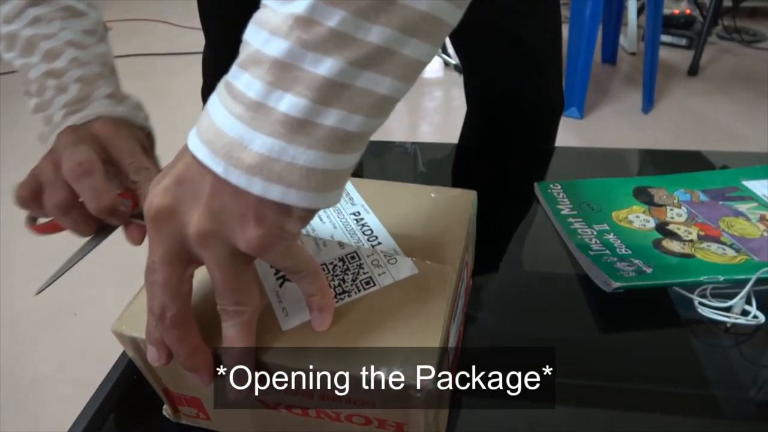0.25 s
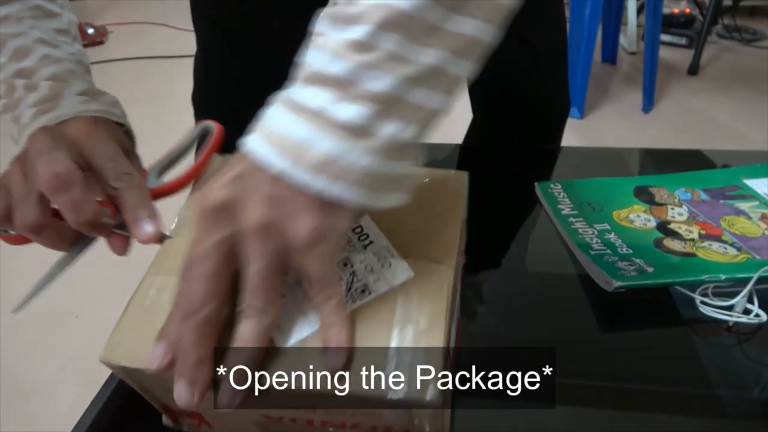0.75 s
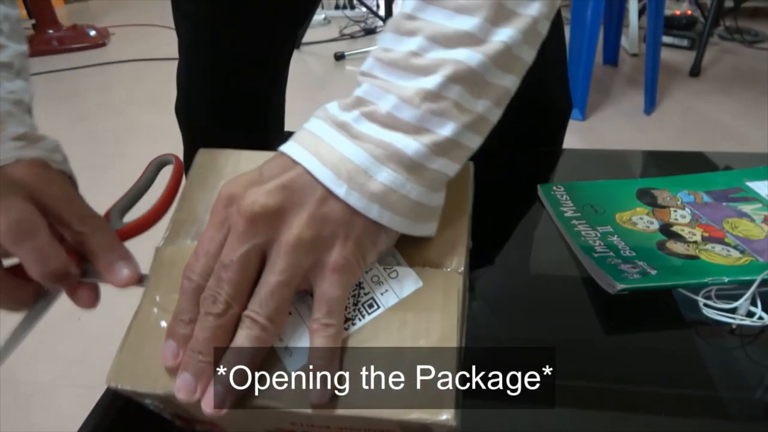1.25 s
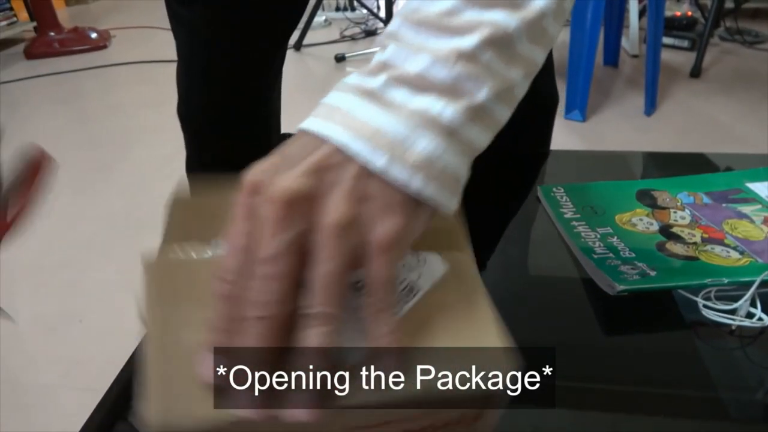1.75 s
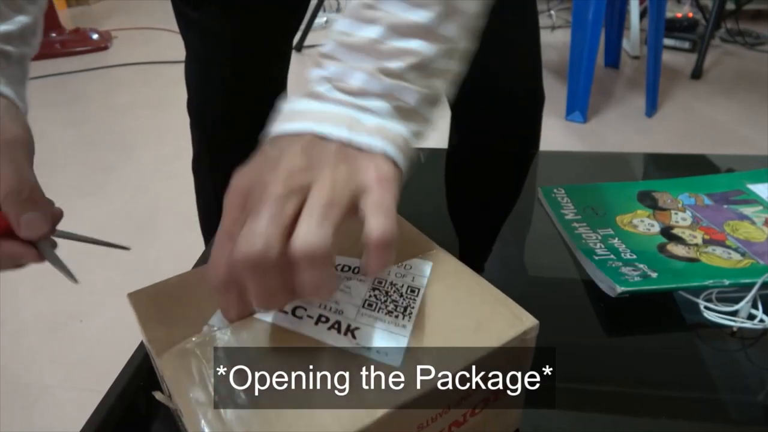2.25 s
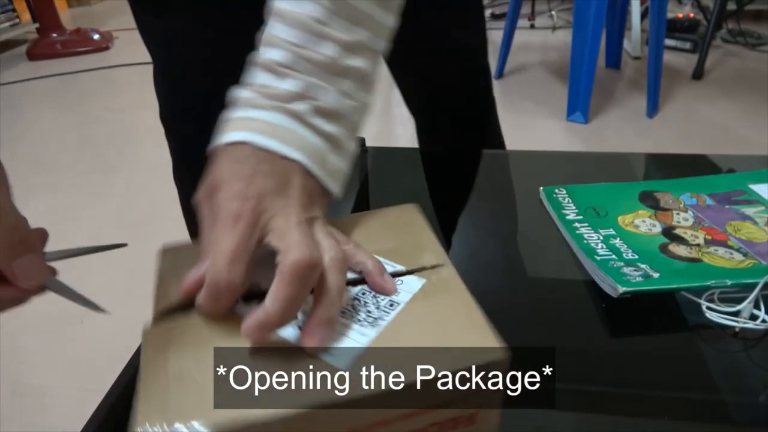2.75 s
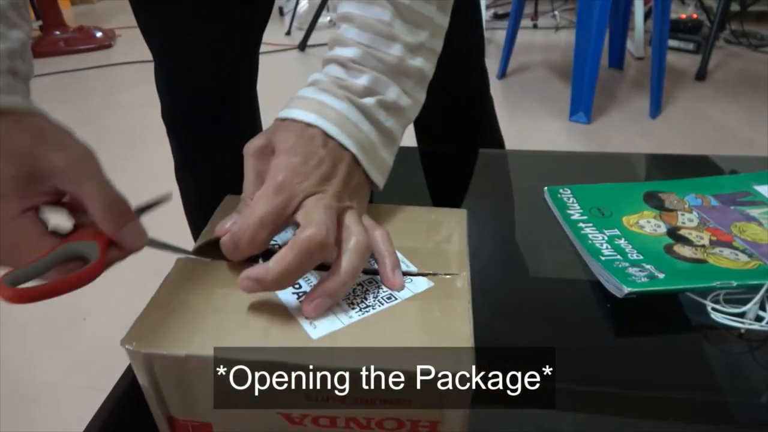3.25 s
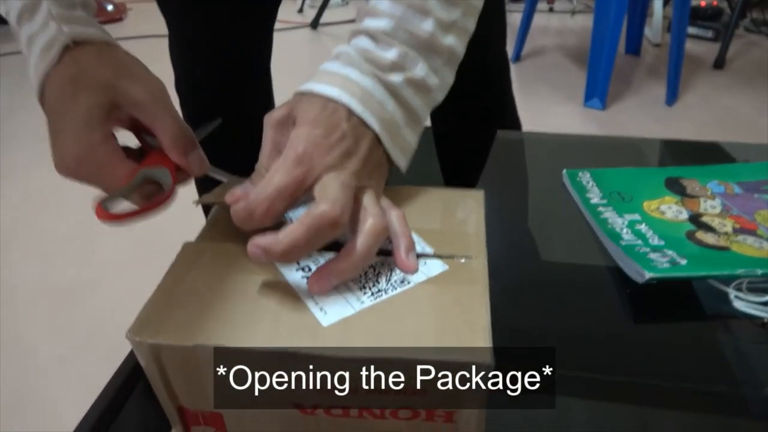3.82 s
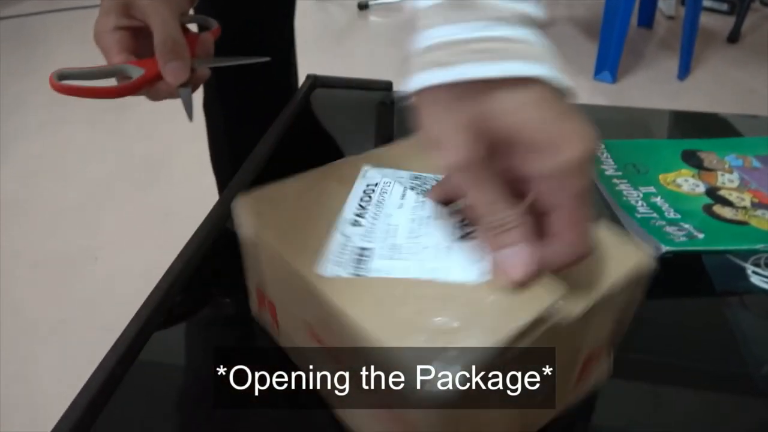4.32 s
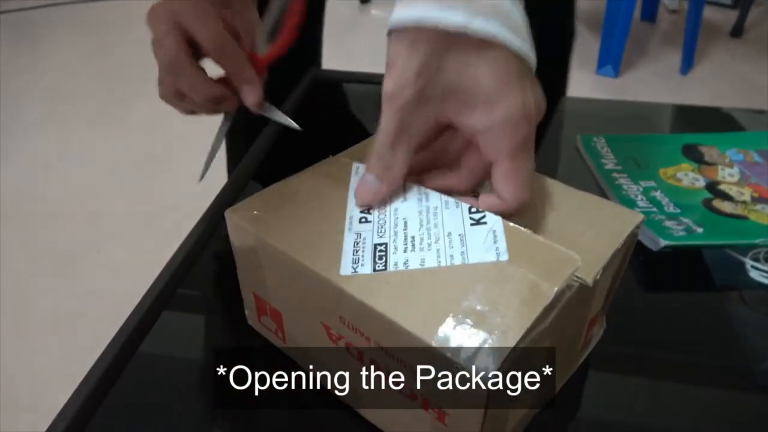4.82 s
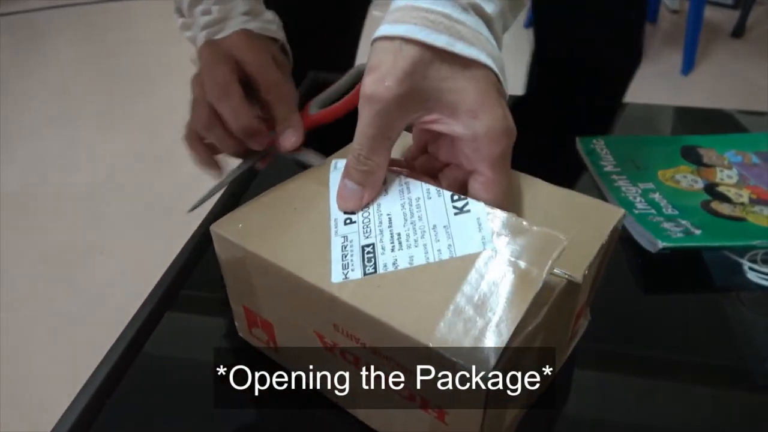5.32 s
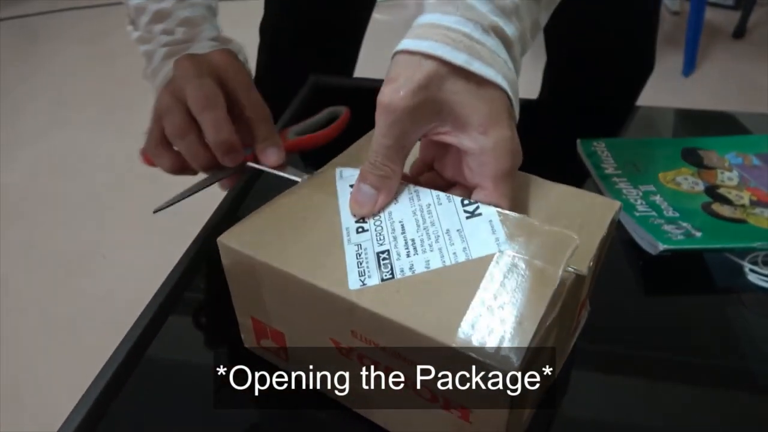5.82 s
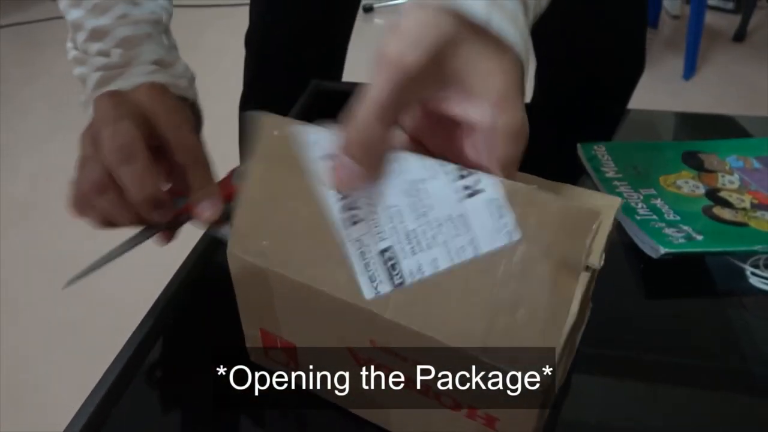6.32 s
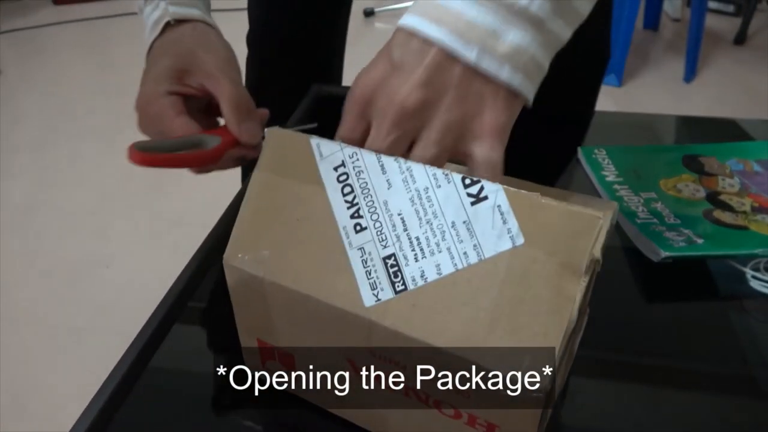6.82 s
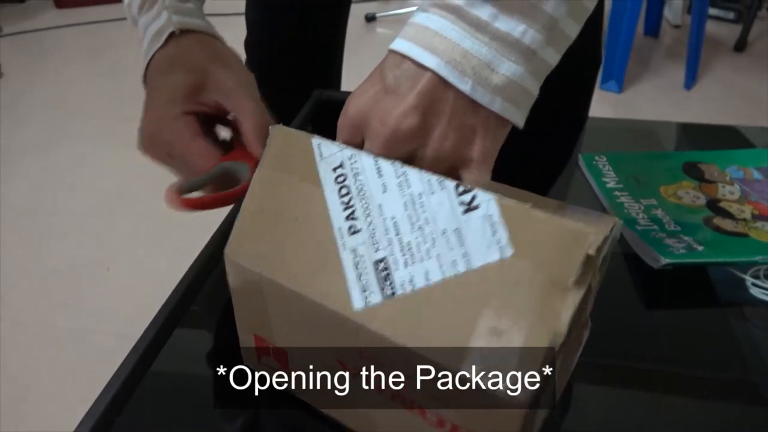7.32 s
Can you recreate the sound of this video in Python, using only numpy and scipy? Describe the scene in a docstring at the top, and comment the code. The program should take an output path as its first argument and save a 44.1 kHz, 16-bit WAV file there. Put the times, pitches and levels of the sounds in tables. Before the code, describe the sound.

A quiet room with soft low air noise and a very faint hum, heard through a small close microphone with short natural reverberation. At 0.1 s a cardboard box shifts gently; from 0.7 s it scuffs softly. Around 0.9 to 1.35 s scissors push through tape with faint ticks, ending in a sharp snap and bright rasp at 1.3 s. The box is turned: a hollow thump and slide at 1.8 s, small knocks near 2.3 s, a firm thud at 2.6 s. After near quiet, tape ticks at 3.5 s and snaps loudly at 3.6 s. Light knocks and brushing hands follow from 4 to 4.8 s, then a lull. From 5.6 s a longer cut grows into coarse ripping near 6 s, with a pop, knocks and short creaks to 6.9 s. Handling knocks at 7 to 7.2 s precede a last abrupt snapping push at 7.37 s and a soft slide.

```python
"""Scissors slit the packing tape of a cardboard box on a glass table, close by in a quiet room with a faint hum.
The box first knocks and slides softly; a short cut at about 1 s ends in a sharp snap and rasping pushes.
Then the box is turned: it slides and knocks, hands brush over it, and taut tape snaps loudly at 3.6 s.
A longer cut follows from 5.6 s with creaks and knocks, and after more handling a last push at 7.35 s.
Rasps and slides are streams of tiny slips through filters; snaps and knocks are bursts with dying tones."""
import sys
import numpy as np
from scipy import signal
from scipy.io import wavfile
from scipy.ndimage import uniform_filter1d

SR = 44100
rng = np.random.default_rng(int(sys.argv[2]) if len(sys.argv) > 2 else 0)


def persist_wave(psi):
    """Save psi, clipped to +-1, as 16-bit WAV."""
    counts = np.round(np.clip(psi, -1, 1) * 32767).astype(np.int16)
    wavfile.write(sys.argv[1], SR, np.atleast_2d(counts).T)


N = 333704  # length of the scene [samples]
EDGE_HZ = 16050  # upper limit of the sound
TAPS = 2048  # length of the colouring filters [samples]
HZ = np.maximum(np.fft.rfftfreq(TAPS, 1 / SR), 1)  # frequencies at which filters are drawn [Hz]

# low tones of the struck box: (frequency [Hz], level [dB], time to fall 60 dB [s])
BOX_MODES = [(110, -12.5, 0.072), (168, -6, 0.048), (292, -5, 0.043), (446, -11, 0.063)]


def stroke(s, rise_s, hold_s, rasp_db, drone_db, fizz_db, tape_hz):
    """The blade tears through tape; the same slips ring tape and lid, shake the box and fizz at the edge."""
    # resonances of the taut tape: (multiple of its pitch [ratio], width [Hz], level [dB])
    tape_modes = [(1, 200, -7.5), (1.3, 220, -9), (1.85, 243, -12), (3.2, 420, -10.5)]
    # spectra of the three parts: (frequency [Hz], relative level [dB])
    rasp_spectrum = [(300, -48), (750, -12), (1200, 5.5), (2500, 3.5), (4800, -0.5), (6500, -13.5),
                     (10000, -44.5)]
    drone_spectrum = [(25, -33.5), (50, -18), (110, -3), (260, 6), (480, -1), (700, -1), (1200, -15.5),
                      (3000, -54)]
    fizz_spectrum = [(2500, -39), (6000, -2.5), (9000, 2.5), (16000, -5.5)]
    # the tape yields during a push, then the blade comes free
    start, force = gesture(s, rise_s, hold_s, sag_db=3, release_s=0.03)
    size = len(force)
    tear = slips(size, per_s=1500, spread_db=0.2, clump_db=0.45, clump_s=0.0045)
    taut = np.zeros(size)
    for multiple, width, db in tape_modes:
        # the free length of tape changes as the blade advances, so each resonance wanders
        wandering_hz = tape_hz * multiple * np.exp(0.08 * wobble(size, over_s=0.025))
        taut += amp(db) * unit(resonate(tear, wandering_hz, width))
    tape_peak_db = hump(tape_hz, below_db=2.0, above_db=-0.5)
    rasp = unit(colour(tear + taut, read(rasp_spectrum) + 0.76 * lid() + tape_peak_db))
    drone = unit(colour(tear, read(drone_spectrum) + lid()))
    fizz = unit(colour(tear, read(fizz_spectrum)))
    return start, force * (amp(rasp_db) * rasp + amp(drone_db) * drone + amp(fizz_db) * fizz)


def tick(s, db, bright_hz, length_s, tail_db):
    """A short run of tape gives way: a burst of uneven fractures, a high ringing tail and a jolt of the box."""
    # tones of the high ringing tail: (frequency [Hz], level [dB], time to fall 60 dB [s])
    tail_tones = [(2487, -2, 0.46), (2850, -5, .35), (3290, -3.5, .4), (4260, -2, 0.52), (4380, -3.5, .45),
                  (5950, -1.5, 0.28), (7483, -0.5, .36), (9889, -15, 0.27), (12720, -10.5, 0.25)]
    blur_hz = 260  # each tone of the ringing tail is widened into a narrow noisy band
    thump_db = -20  # jolt of the box, relative to the snap
    t = np.arange(SR // 2) / SR
    # about three samples in ten hold a fracture
    fractures = unit(rng.standard_normal(len(t)) * (rng.random(len(t)) < .3))
    crack = fractures * np.exp(-(t / max(length_s, 2e-4)) ** 3)
    crack[0] += 2.2  # the first fracture is a large one
    # away from the peak the spectrum levels off: the fractures are bright, the more so in a bright snap
    fine_db = hump(12500, below_db=0.5, above_db=1.0) - 15.0 + 3.5 * np.log2(bright_hz / 3000)
    peak_db = hump(bright_hz * 0.74, below_db=18, above_db=11.5)
    snap = sized(colour(crack, np.maximum(peak_db, fine_db) + lid()), db)
    ringing = sum(ring([tone], t) * wobble(len(t), 1 / blur_hz) for tone in tail_tones)
    return s, snap + sized(ringing, db + tail_db) + sized(ring(BOX_MODES, t), db + thump_db)


def slide(s, rise_s, hold_s, rumble_db, hiss_db):
    """Cardboard judders over the table while skin and sleeve brush its face."""
    # spectra of cardboard and of brushing: (frequency [Hz], relative level [dB])
    rumble_spectrum = [(50, -39), (130, 1.5), (280, 1.5), (480, -0.5), (700, -5), (1000, -13.5),
                       (2000, -17), (5000, -53)]
    brush_spectrum = [(700, -12), (3000, -2.5), (6500, -0.5), (9500, 3.5), (16000, -3)]
    # friction slows a shove, then the box comes to rest
    start, speed = gesture(s, rise_s, hold_s, sag_db=3, release_s=0.08)
    judder = slips(len(speed), per_s=2200, spread_db=1.5, clump_db=5, clump_s=0.011)
    fibres = slips(len(speed), per_s=9200, spread_db=2.0, clump_db=3.75, clump_s=0.008)
    rumble = unit(colour(judder, read(rumble_spectrum) + lid()))
    hiss = unit(colour(fibres, read(brush_spectrum)))
    return start, speed * (amp(rumble_db) * rumble + amp(hiss_db) * hiss)


def creak(s, length_s, db, pitch_hz, glide, centre_hz):
    """Rubbing cardboard or tape catches and slips at a nearly steady rate: a short, hoarse, pitched squeak."""
    arch = 0.0556  # the pitch bends up by about this share toward the middle
    jitter = 0.028  # unsteadiness of the pitch, as a share of it
    roughness = 0.3  # noise, relative to the pitched part
    u = np.arange(-.5, .5, 1 / (length_s * SR))  # place within the creak, 0 in the middle
    bend = glide * u - arch * (2 * u) ** 2 + jitter * wobble(len(u), over_s=0.0038)
    turns = np.cumsum(pitch_hz * np.exp(bend)) / SR
    # all harmonics together make one sharp pulse per slip
    pulses = sum(np.cos(2 * np.pi * k * turns) for k in np.arange(1, EDGE_HZ / pitch_hz))
    rub = unit(pulses) + roughness * rng.standard_normal(len(u))
    voiced = unit(colour(rub, hump(centre_hz, below_db=12.5, above_db=15) + lid()))
    return s - length_s / 2, amp(db) * voiced * np.cos(np.pi * u)


def knock(s, db, hz, length_s):
    """A panel flexes in two modes for a few cycles, flaps chatter, and the box rings."""
    t = np.arange(SR // 5) / SR
    dying = np.exp(-t / max(length_s * 0.65, 5e-4))
    low_mode = np.sin(2 * np.pi * hz * t)
    high_mode = amp(-15) * np.sin(2 * np.pi * hz * 2.05 * t)
    flex = unit(dying * (low_mode + high_mode))
    clatter = rng.choice([-1, 1], len(t)) * dying
    chatter = unit(colour(clatter, hump(hz, below_db=6.0, above_db=6.0) + lid()))
    # higher-pitched knocks chatter more
    blow = flex + hz / 660 * chatter + amp(-6.5) * unit(ring(BOX_MODES, t))
    # the soft contact cuts the treble, and a small panel radiates little deep bass
    treble_cut = 1 + (HZ / (hz * 1.5)) ** 2.2
    bass_cut = 1 + (hz * 0.43 / HZ) ** 4
    contact_db = -10 * np.log10(treble_cut * bass_cut)
    return s, sized(colour(blow, np.maximum(contact_db, -26)), db)


def lid():
    """The taped lid resonates in every cut and blow: its lift in dB at each frequency."""
    # resonances of the lid: (frequency [Hz], width [Hz], lift [dB])
    lid_modes = [(482, 96, 8.5), (834, 100, 3.5), (1325, 560, 6), (2290, 520, 1.5), (4250, 240, 2.5),
                 (5600, 720, 3.5), (8170, 3400, 1)]
    return sum(db / (1 + (2 * (HZ - hz) / width) ** 2) for hz, width, db in lid_modes)


def room(x):
    """A few near reflections, then a tail in which each band dies at its own speed."""
    # how long the room rings: (frequency [Hz], time to fall 60 dB [s])
    decay_times = [(100, 0.38), (400, 0.4), (1000, 0.38), (2800, 0.46), (7000, 0.47), (15000, 0.42)]
    # reflections from table, walls and floor: (delay [s], level [dB])
    reflections = [(.0055, -11.5), (0.0124, -11), (0.0203, -23)]
    taps = rng.choice([-1., 1.], SR) * (rng.random(SR) < 6000 / SR)  # about 6000 echoes in 1 s
    hz, t, bands = signal.stft(taps, SR, nperseg=256)
    decay = amp(-60 * t / read(decay_times, hz)[:, None])
    tail = signal.istft(bands * decay, SR, nperseg=256)[1]
    tail *= np.clip((np.arange(len(tail)) / SR - .005) / .009, 0, 1)  # fades in from 5 to 14 ms
    tail /= np.linalg.norm(tail)
    for delay, db in reflections:
        add(tail, delay, amp([db]))
    return signal.fftconvolve(x, tail)[:N]


def background():
    """Steady air noise is coloured random noise; a faint hum is a sine tone."""
    # spectrum of the quiet room: (frequency [Hz], relative level [dB])
    air_spectrum = [(15, -87), (25, -39.5), (102, 4), (134, -9.5), (161, -4.5), (229, -5), (270, -10),
                    (439, -9), (591, -10), (1100, -12), (2220, -17), (6560, -33), (12200, -37),
                    (16000, -40)]
    # tones of the hum: (frequency [Hz], level [dB])
    hum_tones = [(101, -70)]
    t = np.arange(N) / SR
    hum = np.zeros(N)
    for hz, db in hum_tones:
        hum += amp(db) * np.sqrt(2) * np.sin(2 * np.pi * (hz * t + rng.random()))
    air = unit(colour(rng.standard_normal(N), read(air_spectrum)))
    return amp(-57.5) * air + hum


def gesture(s, rise_s, hold_s, sag_db, release_s):
    """Start time and envelope of one move of the hand: it swells, sags a little while held, and dies away."""
    swell_db = 19.5  # gained in each rise time and lost in each release time; both last two such times
    t = np.arange(-2 * rise_s, hold_s + 2 * release_s, 1 / SR)
    corners = [-2 * rise_s, 0, hold_s, hold_s + 2 * release_s]
    levels_db = [-2 * swell_db, 0, -sag_db, -sag_db - 2 * swell_db]
    return s + t[0], amp(np.interp(t, corners, levels_db))


def slips(size, per_s, spread_db, clump_db, clump_s):
    """Stick and slip: tiny releases of uneven size that come in louder and softer clumps."""
    uneven_db = spread_db * np.minimum(rng.exponential(1, size), 3)
    sizes = amp(uneven_db + clump_db * wobble(size, clump_s))
    happens = rng.random(size) < per_s / SR
    return unit(sizes * rng.choice([-1, 1], size) * happens)


def wobble(size, over_s):
    """Smooth chance of rms 1 that changes within over_s."""
    width = max(int(over_s * SR), 1)
    return unit(uniform_filter1d(rng.standard_normal(size), width, mode="wrap"))


def ring(modes, t):
    """Tones that die away, each at its own speed."""
    return sum(amp(db - 60 * t / t60) * np.sin(2 * np.pi * hz * t) for hz, db, t60 in modes)


def resonate(x, hz, width):
    """A resonance of gain 1 whose frequency can follow a curve."""
    turn = np.exp(2j * np.pi * np.cumsum(hz * np.ones(len(x))) / SR)
    r = np.exp(-np.pi * width / SR)
    # shift the resonance down to 0 Hz, smooth there, and shift back
    return 2 * (turn * signal.lfilter([1 - r], [1, -r], x / turn)).real


def hump(hz, below_db, above_db):
    """A rounded peak at hz whose skirts fall by so many dB an octave (a negative fall rises)."""
    octaves = np.log2(HZ / hz)
    return -np.where(octaves < 0, below_db, above_db) * (np.hypot(octaves, .5) - .5)


def colour(x, db):
    """Filter with the given gain on the HZ grid that acts only after each sound arrives."""
    log_gain = np.log(amp(np.r_[db, db[-2:0:-1]]))
    # the Hilbert transform finds the phase that makes the filter respond at once
    response = np.fft.ifft(np.exp(np.conj(signal.hilbert(log_gain)))).real
    return signal.oaconvolve(x, response)[:len(x)]


def read(points, hz=HZ):
    """Reads a curve of (frequency, value) points along a log-frequency axis."""
    f, value = np.transpose(points)
    return np.interp(np.log(hz + 1), np.log(f + 1), value)


def amp(db):
    """Decibels to gain."""
    return 10 ** (np.asarray(db) / 20)


def unit(x):
    """Scales to rms 1."""
    return x / np.sqrt(np.mean(x ** 2) + 1e-20)


def sized(x, db):
    """Scales a blow so that its energy, spread over 5 ms, has the level db."""
    return amp(db) * x * np.sqrt(.005 * SR / np.sum(x ** 2))


def add(mix, s, sound):
    """Mixes a sound in at time s."""
    part = mix[max(round(s * SR), 0):][:len(sound)]
    part += sound[:len(part)]


def track(sounds):
    """Lays (time, sound) pairs on one track."""
    mix = np.zeros(N)
    for s, sound in sounds:
        add(mix, s, sound)
    return mix


def scene():
    """All the handling, direct and through the room, over the background."""
    # pushes of the blade: (full force at [s], rise [s], hold [s], rasp [dB], box drone [dB], fizz [dB],
    # pitch of the taut tape [Hz])
    pushes = [ (0.741, 0.042, 0.048, -51, -51, -72, 1130), (0.919, 0.0088, 0.063, -39.5, -35.5, -46, 1290),
              (0.992, 0.014, 0.23, -57, -47, -61.5, 1300), (1.262, 0.033, 0.026, -44, -37, -57, 1420),
              (1.309, .016, 0.024, -27, -39.5, -30.5, 2710), (1.346, 0.011, 0.012, -37, -35.5, -54, 1100),
              (4.344, 0.055, 0.0095, -53.5, -54, -61, 1570), (5.565, 0.064, 0.053, -45.5, -54, -53.5, 1900),
              (5.749, 0.025, 0.078, -42.5, -49, -46.5, 1620), (5.901, 0.045, 0.042, -50, -52.5, -56, 1380),
              (5.939, .014, 0.063, -31, -36.5, -39.5, 1050), (5.972, 0.0054, 0.057, -25.5, -37, -43, 1230),
              (6.046, 0.021, 0.063, -34.5, -47.5, -38.5, 1320), (6.278, .015, 0.0087, -36, -35, -44, 1370),
              (6.478, 0.05, 0.028, -53, -54, -46, 1540), (6.861, 0.066, 0.014, -53.5, -59, -59.5, 1290),
              (7.348, 0.014, 0.026, -36, -30.5, -43.5, 1120),
              (7.372, 0.006, 0.042, -31, -27.5, -31.5, 1050)]
    # tape ticks and snaps: (time [s], level [dB], brightness, the peak lies at 0.74 of it [Hz], length [s],
    # level of the ringing tail relative to the snap [dB])
    snaps = [(0.74, -38.5, 1590, 0.0072, -37), (0.915, -42, 5400, 0.004, -9.5),
             (0.957, -44, 3000, 0.002, -33.5), (1.052, -42.5, 2000, 0.0018, -30),
             (1.073, -40, 1900, 0.0018, -26), (1.094, -38, 2200, 0.0015, -29.5),
             (1.113, -43, 2200, 0.0018, -28.5), (1.176, -40.5, 1900, 0.0012, -26),
             (1.202, -42, 1700, 0.0018, -15), (1.212, -44, 1900, 0.002, -30),
             (1.2685, -21, 5000, 0.0008, -21), (1.2706, -25.5, 3000, 0.0025, -15),
             (2.085, -39, 7200, 0.003, -43), (2.273, -49.5, 2200, 0.004, -40),
             (2.314, -47.5, 1690, 0.0022, -40), (2.598, -37, 2400, 0.0032, -40),
             (3.357, -50.5, 2780, 0.0022, -22.5), (3.3855, -47, 4720, 0.008, -21),
             (3.467, -31.5, 3600, 0.0029, -14.5), (3.498, -27, 2600, 0.0025, -19.5),
             (3.6, -15.5, 4830, 0.0043, -11.5), (4.139, -46.5, 6720, 0.0028, -36),
             (4.164, -46, 6770, 0.0009, -37), (4.2687, -50.5, 5100, 0.00028, -40),
             (5.973, -43, 1900, 0.004, -16), (6.2127, -23, 1440, 0.004, -14.5),
             (6.277, -41, 1300, 0.0045, -28), (6.349, -43, 1500, .002, -28),
             (7.233, -41.5, 1500, 0.0091, -14), (7.369, -17, 8000, 0.003, -12)]
    # shoves of box and hands: (full speed at [s], rise [s], hold [s], cardboard rumble [dB], brushing hiss [dB])
    shoves = [ (0.129, 0.064, 0.011, -53, -62), (0.687, 0.058, 0.13, -50.5, -55),
              (1.603, 0.05, 0.025, -55, -57), (1.831, 0.024, 0.0062, -33, -45),
              (1.882, 0.023, 0.012, -53, -51.5), (2.225, 0.028, 0.16, -51, -58.5),
              (2.42, 0.032, 0.3, -60.5, -65.5), (2.579, 0.0022, 0.0081, -55, -39.5),
              (2.602, 0.0074, 0.013, -39.5, -45.5), (3.378, 0.085, 0.066, -50.5, -64.5),
              (3.5, 0.063, 0.13, -43.5, -55), (3.611, 0.01, 0.044, -32, -39),
              (3.904, 0.042, 0.077, -65, -52), (4.075, 0.064, 0.089, -46, -55),
              (4.143, 0.029, 0.032, -47.5, -49.5), (4.273, 0.047, 0.045, -69, -59),
              (4.545, .11, 0.047, -47.5, -46.5), (4.657, 0.037, 0.15, -52, -61),
              (6.325, 0.037, 0.046, -47, -54.5), (6.526, 0.072, 0.048, -49.5, -51),
              (6.676, 0.059, 0.027, -48, -56), (7.103, 0.064, 0.027, -49, -75),
              (7.232, 0.029, 0.0088, -35.5, -57), (7.531, 0.096, 0.049, -41, -51)]
    # creaks of flaps and squeaks of tape: (middle [s], length [s], level [dB], slip rate [Hz],
    # glide [share of the rate], centre [Hz])
    squeaks = [(3.909, .08, -52.5, 2780, 0.12, 6000), (6.096, 0.036, -36, 700, 0.035, 910),
               (6.247, 0.053, -42.5, 261.4, 0.037, 1320), (6.295, .045, -43, 195, -0.39, 201),
               (6.495, 0.059, -43.5, 535, -0.046, 1025), (6.68, 0.047, -52, 263, -0.081, 560),
               (6.858, 0.054, -43, 433.3, 0.013, 1050), (7.105, .06, -45, 253, 0, 530)]
    # knocks of box and flaps: (time [s], level [dB], pitch [Hz], length, the decay takes 0.65 of it [s])
    blows = [(0.1274, -44.5, 322, 0.014), (0.959, -31.5, 644, 0.0089), (1.27, -41, 656, 0.0062),
             (1.277, -31, 145, .015), (1.613, -44.5, 600, 0.0078), (1.832, -23, 610, 0.011),
             (1.835, -22, 220, 0.0026), (1.837, -27, 85, 0.035), (2.2214, -35.5, 234, 0.0051),
             (2.277, -36, 435, 0.011), (2.312, -35, 285, 0.0041), (2.596, -18, 324, 0.0085),
             (3.036, -47, 342, 0.004), (3.6029, -23.5, 890, 0.0039), (3.645, -33.5, 325, 0.0048),
             (3.969, -44.5, 560, 0.018), (4.003, -35, 626, 0.0055), (4.037, -26, 363, 0.0019),
             (4.142, -33.5, 375, 0.012), (4.4455, -37.5, 359, 0.011), (4.539, -36.5, 462, 0.02),
             (4.745, -43, 573, 0.022), (5.162, -47, 340, 0.0026), (5.353, -43.5, 665, 0.019),
             (5.815, -33.5, 627, 0.011), (6.205, -26.5, 1253, 0.011), (6.21, -22.5, 473, 0.012),
             (6.277, -31.5, 655, 0.0065), (6.325, -41.5, 550, 0.0046), (6.345, -41, 710, 0.0047),
             (6.37, -35, 678, 0.008), (7.022, -31.5, 520, 0.0051), (7.131, -37.5, 526, 0.0095),
             (7.228, -25.5, 515, 0.012), (7.338, -31, 297, 0.012), (7.3702, -22, 673, 0.0042),
             (7.3925, -21, 193, 0.025)]
    cutting = track(stroke(*row) for row in pushes)
    ticks = track(tick(*row) for row in snaps)
    sliding = track(slide(*row) for row in shoves) + track(creak(*row) for row in squeaks)
    knocks = track(knock(*row) for row in blows)
    wet = room(amp(-9.0) * cutting + amp(-11.5) * sliding + amp(-9.0) * ticks + amp(-7.5) * knocks)
    return (cutting + sliding + ticks + knocks + wet + background())[None]


def record(dry):
    """The small microphone loses the deepest bass; then everything above EDGE_HZ is cut."""
    bass_cut = signal.butter(2, 45, "highpass", fs=SR, output="sos")
    thin = signal.sosfilt(bass_cut, dry)
    band_limit = signal.firwin(401, EDGE_HZ, window=("kaiser", 9), fs=SR)
    return signal.oaconvolve(thin, band_limit[None], "same")


dry = scene()
out = record(dry)
persist_wave(out)
```